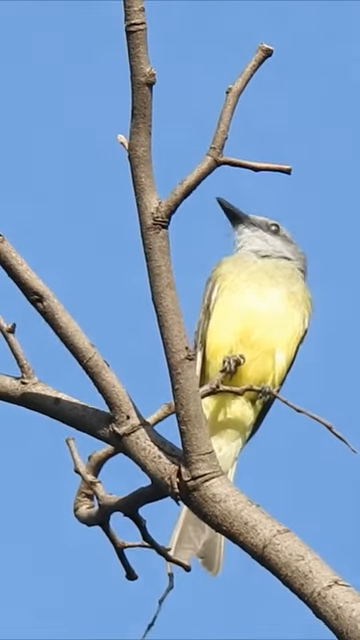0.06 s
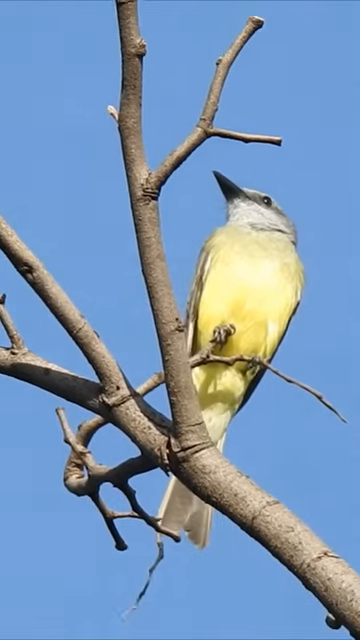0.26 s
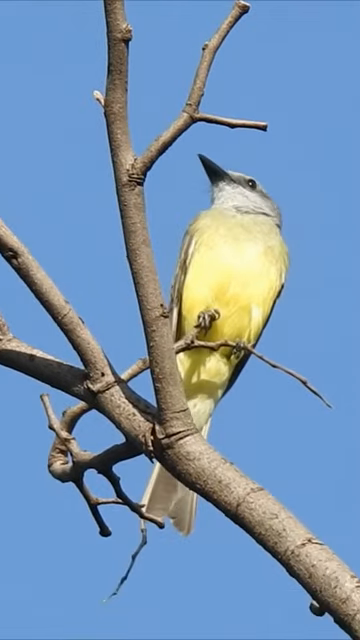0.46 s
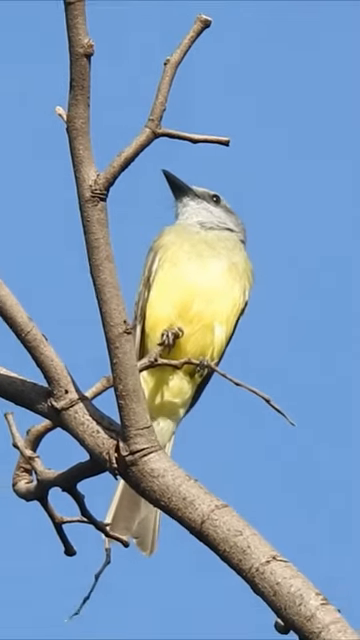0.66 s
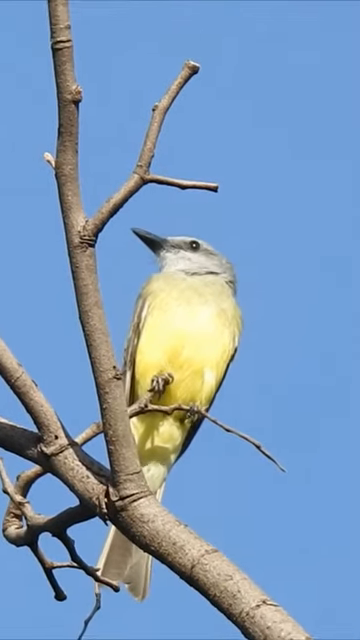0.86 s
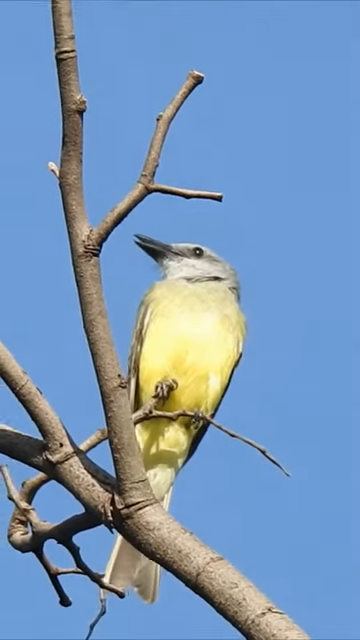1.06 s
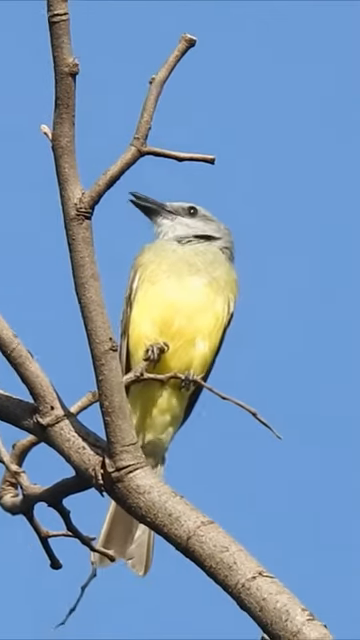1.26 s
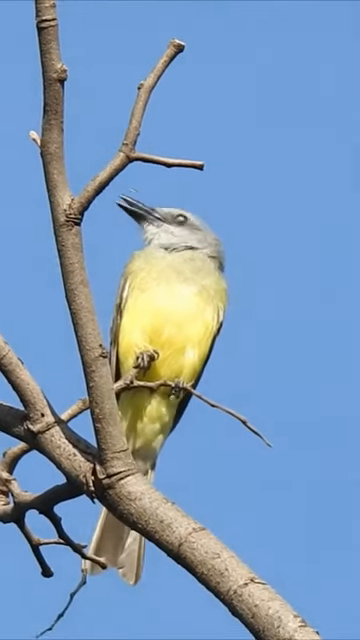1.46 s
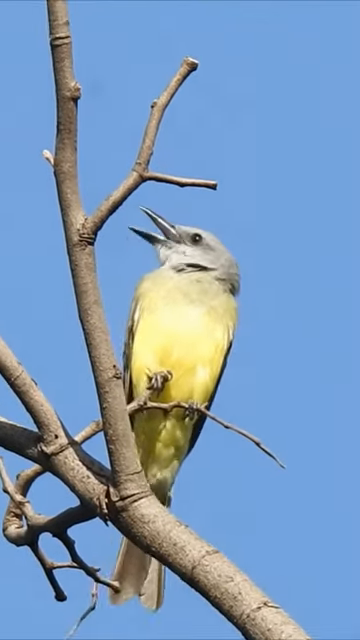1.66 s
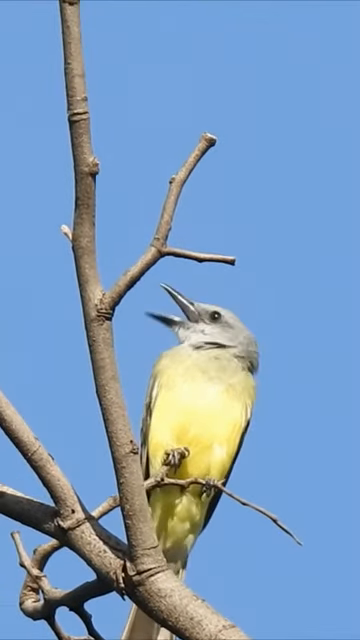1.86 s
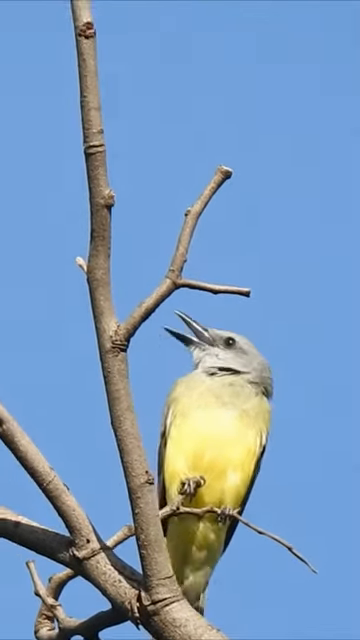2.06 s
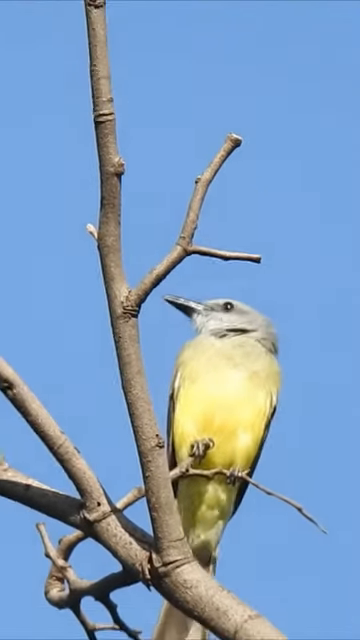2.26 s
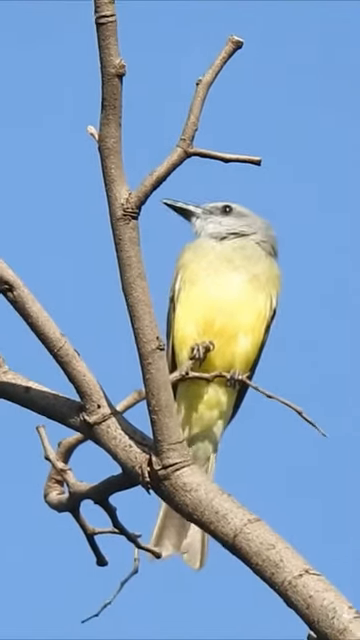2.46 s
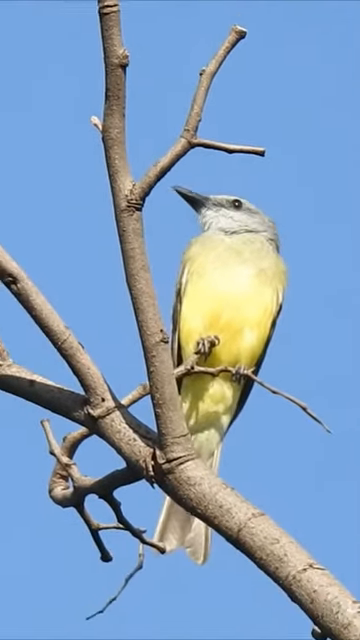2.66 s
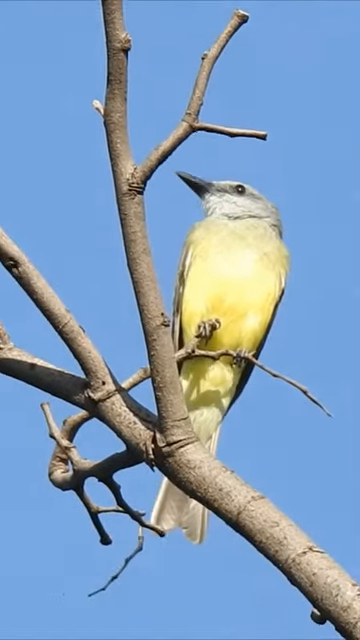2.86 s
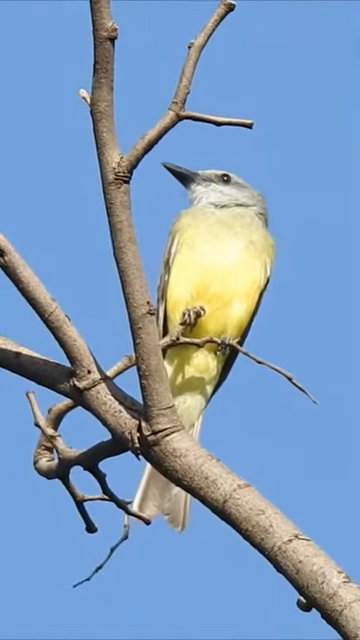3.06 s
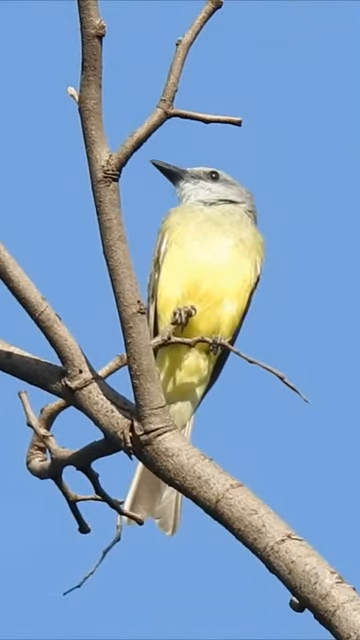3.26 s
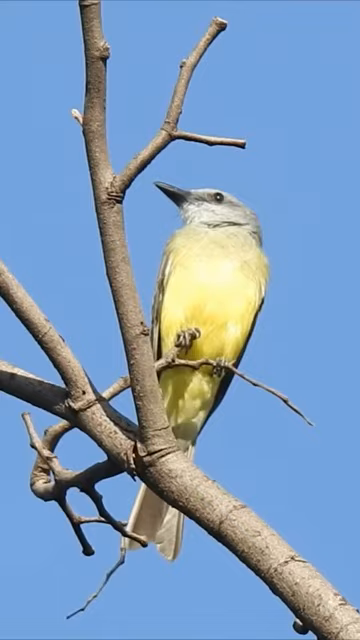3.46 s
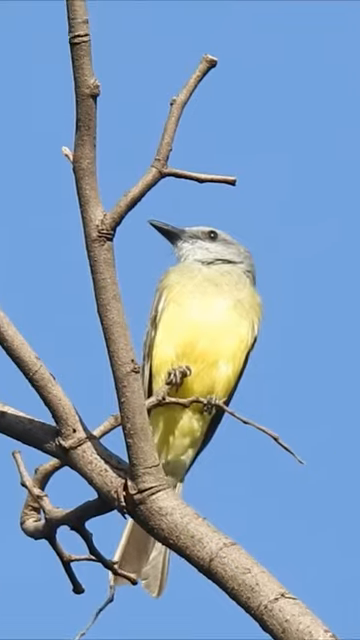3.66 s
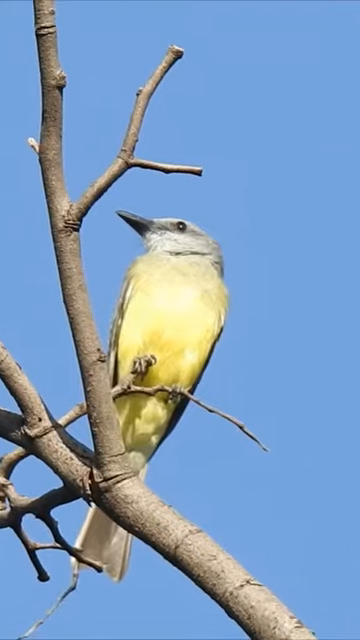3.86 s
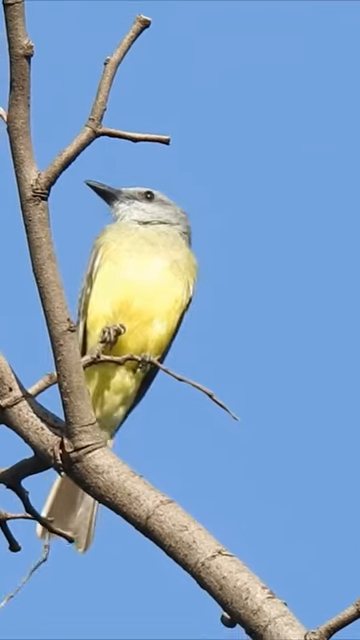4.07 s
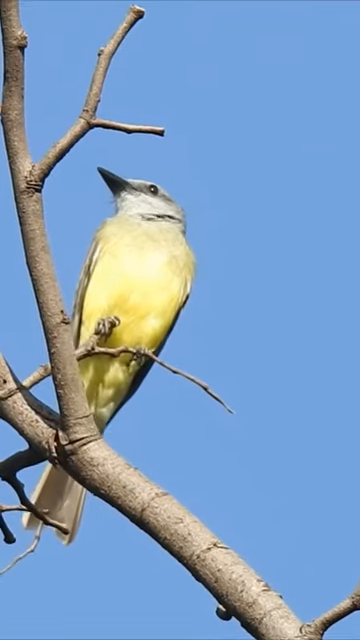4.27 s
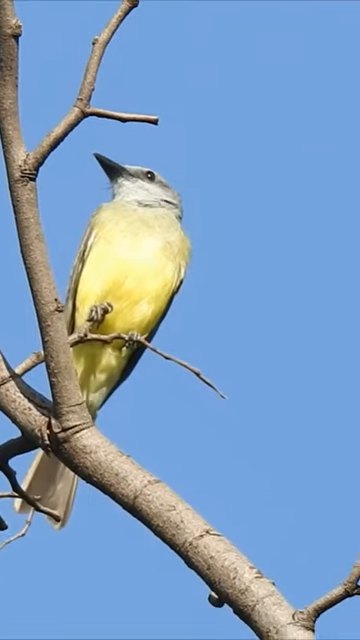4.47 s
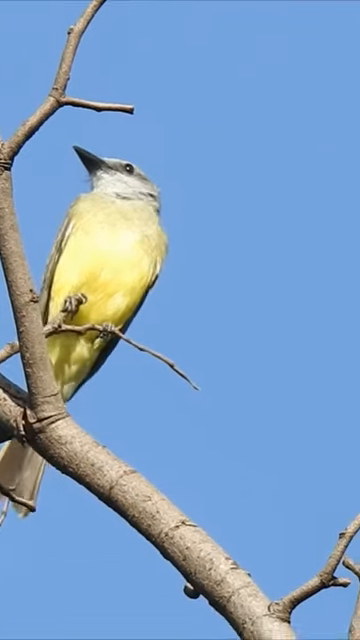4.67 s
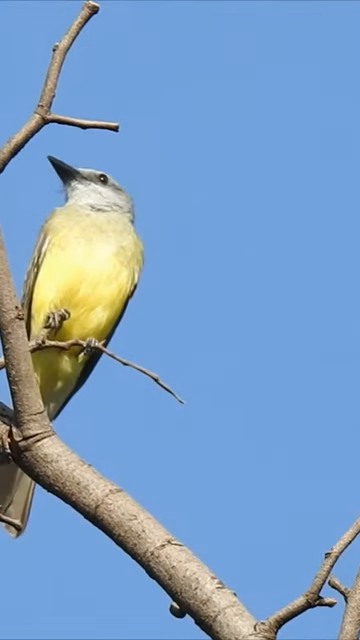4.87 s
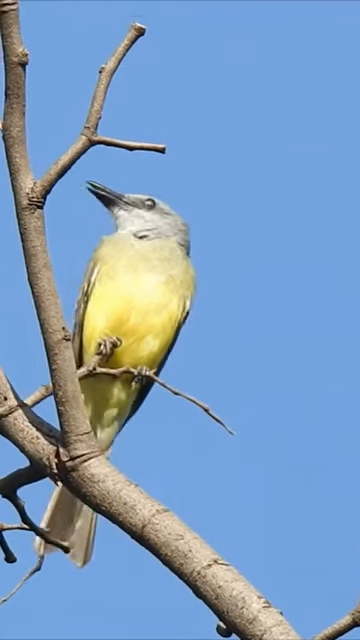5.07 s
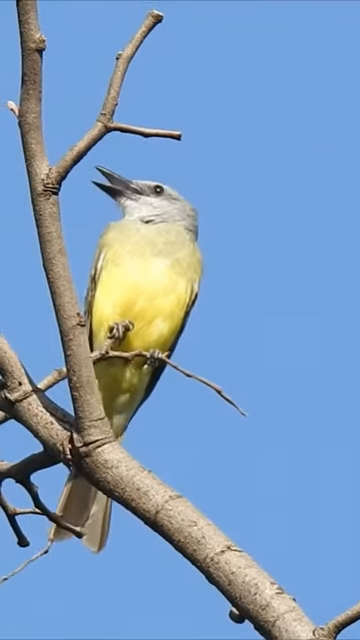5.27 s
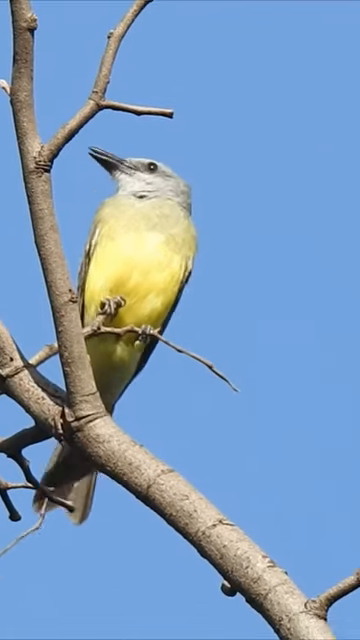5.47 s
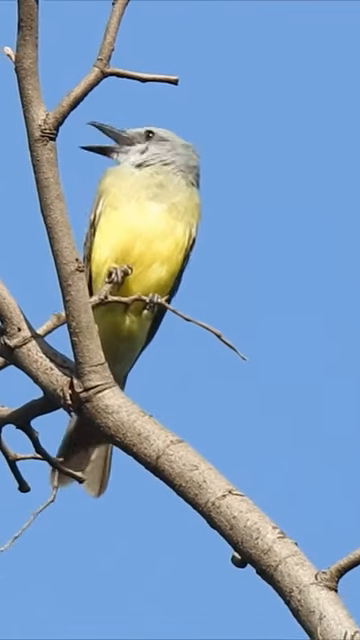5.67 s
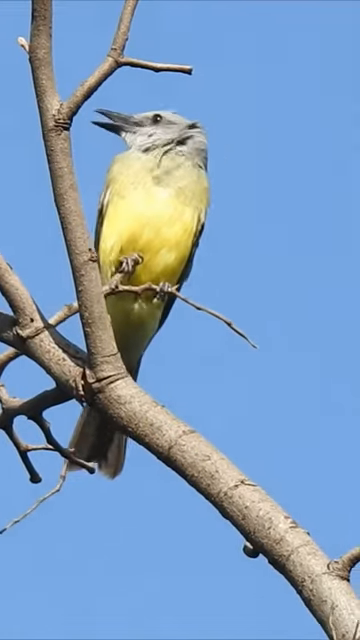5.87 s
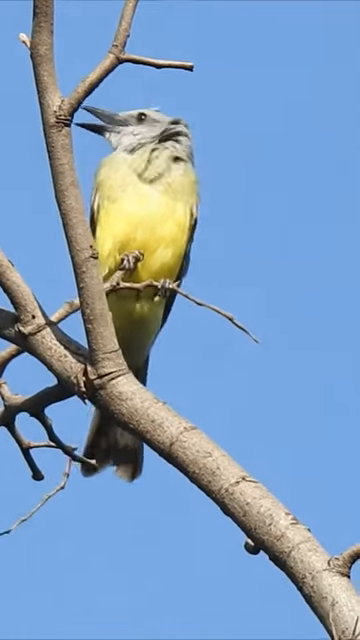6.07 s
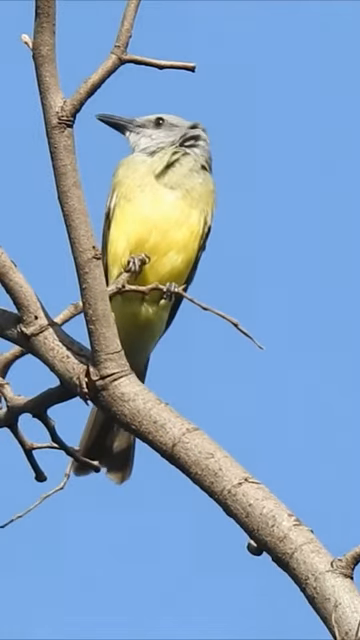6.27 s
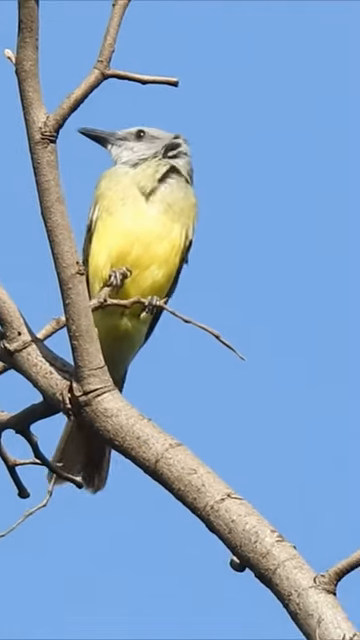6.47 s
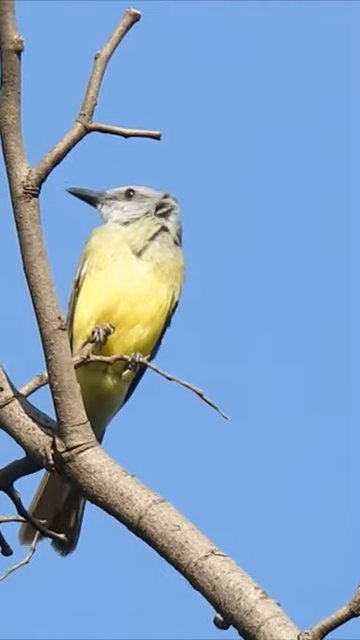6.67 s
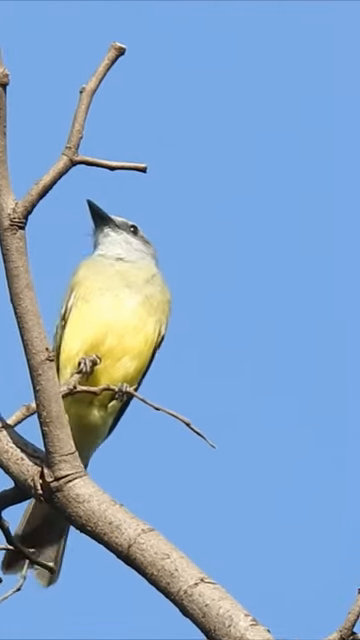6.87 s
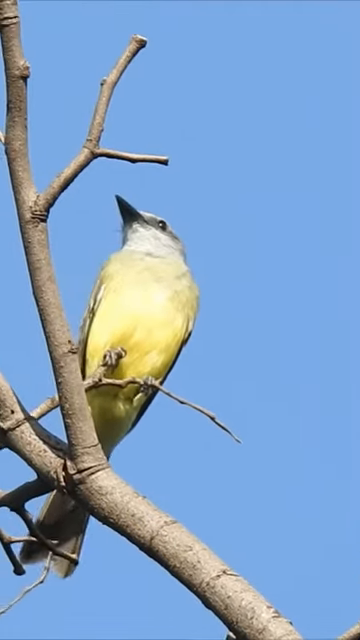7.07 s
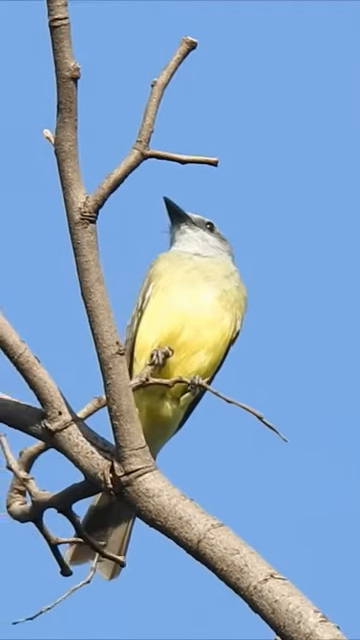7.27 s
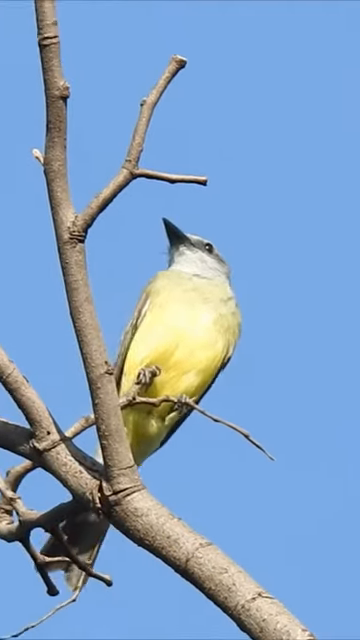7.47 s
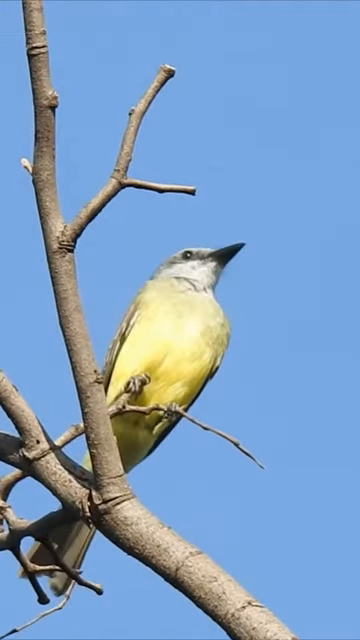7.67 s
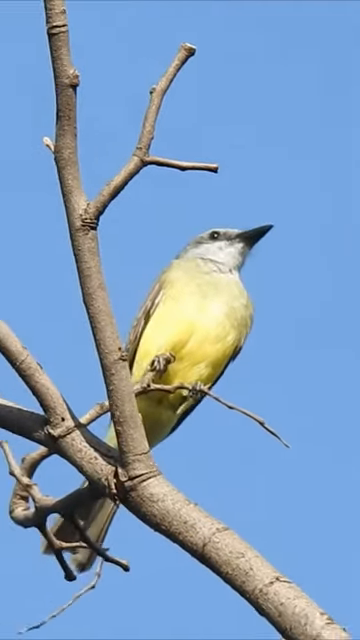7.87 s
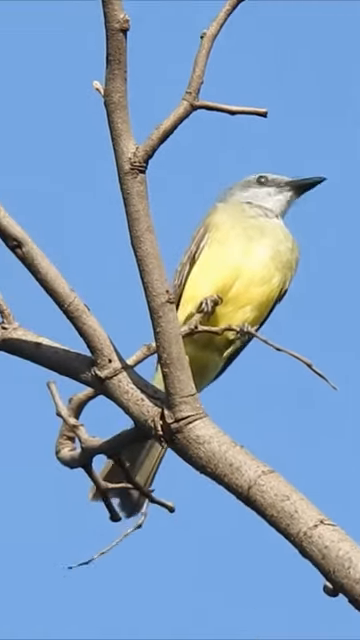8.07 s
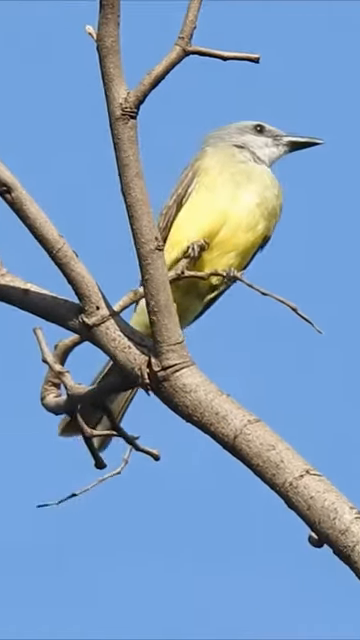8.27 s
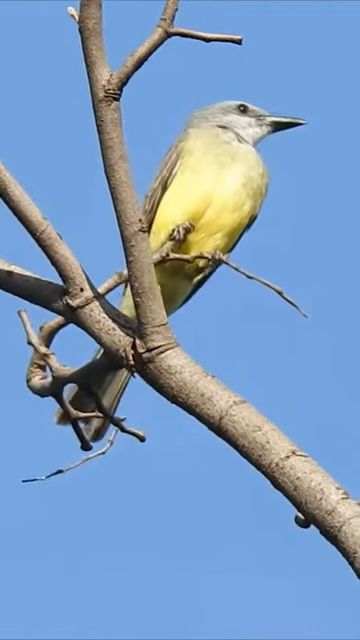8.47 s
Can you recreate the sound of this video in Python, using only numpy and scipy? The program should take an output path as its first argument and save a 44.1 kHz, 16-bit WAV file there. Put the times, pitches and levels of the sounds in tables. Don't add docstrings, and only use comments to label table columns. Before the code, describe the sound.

Outdoors near a road, a small yellow-breasted bird on a bare branch sings close to a hand-held camera. Its first rapid phrase of sharp, near-pure whistles comes after about a second, overloading slightly, with dry bill snaps. Far birds chip and slur, a neighbour trills quickly, then the singer repeats nearly the same phrase. Traffic wash, a thin insect hum and a low idling engine continue underneath; the engine fades at the end.

```python
import sys
import numpy as np
from scipy import signal
from scipy.fft import rfft, irfft, next_fast_len
from scipy.io import wavfile
from scipy.ndimage import uniform_filter1d, map_coordinates

SR = 44100
rng = np.random.default_rng(int(sys.argv[2]) if len(sys.argv) > 2 else 0)


def digitize_waveform(pressure):
    field = np.atleast_2d(pressure).T
    bounded = np.clip(field, -1, 1)
    quanta = np.round(bounded * 32767).astype(np.int16)
    wavfile.write(sys.argv[1], SR, quanta)


def amplitude_ratio(level_db):
    exponent = np.asarray(level_db, float) / 20
    return 10 ** exponent


N = 376173

# (frequency [Hz], density [dB per Hz])
RUMBLE = [(15, -39.5), (30, -23.5), (50, -4.5), (72, 3), (100, -4.5), (150, -14), (300, -43)]
# (time [s], half width [s], rise [dB])
REVS = [
    (2.1, .3, 3),
    (6.6, .45, 3),
]
# (frequency [Hz], density [dB per Hz])
TRAFFIC = [(60, -24), (130, 0.5), (250, 0), (600, -7), (1500, -9.5), (2300, -12.5), (3400, -13.5),
           (3900, -17), (4500, -12.5), (5500, -9), (7000, -18), (10000, -25.5), (15700, -33)]
# (frequency [Hz], width [Hz], level [dB])
DRONES = [(197, 26, 3.5), (400, 16, 2), (606, 50, 5.5), (850, 17, 6.5), (1030, 24, 7.5), (1358, 23, 6.5),
          (1492, 18, 7.5)]
# (time [s], half width [s], rise [dB])
PASSES = [(0, .2, 3), (.92, .25, 3), (2.0, .3, 1.5), (2.82, .14, 2.5), (3.42, .12, 2), (4.1, .35, 3),
          (4.85, .35, 2.5), (6.8, .5, 2), (8.5, .3, 3.5)]
# (frequency [Hz], width [Hz], level [dB])
INSECTS = [
    (4962, 80, 0),
    (5080, 170, -2),
]
# (time [s], level [dB])
CHORUS = [(0, -56), (2.4, -54), (4.75, -50), (6.4, -49.5), (8.53, -52)]
# (frequency [Hz], correlation [-1 to 1])
ALIKE = [(60, 1), (130, 0.87), (280, 0.77), (610, 0.75), (1310, 0.76), (2840, 0.4), (6140, 0.04)]
# (time [s], start [Hz], end [Hz], level [dB])
CHIPS = [(.745, 5700, 5850, -53), (.82, 6000, 6250, -52), (.893, 5900, 7200, -49),
         (2.94, 5700, 6470, -54.5), (3.09, 6200, 7020, -47), (3.555, 5400, 6140, -52),
         (3.83, 6300, 7200, -44), (6.79, 6400, 7300, -48), (7.56, 5500, 5900, -47), (7.69, 5500, 6600, -52),
         (7.795, 5300, 6300, -45), (7.855, 5500, 6400, -46), (7.91, 5300, 6200, -45.5),
         (8.0, 5900, 6000, -47)]
# (time [s], length [s], start [Hz], end [Hz], level [dB])
SLURS = [(.002, .18, 5600, 5160, -58), (.31, .05, 6250, 6150, -52), (.38, .12, 5950, 5700, -53.5),
         (1.0, .17, 5240, 5200, -60), (2.27, .05, 3100, 2950, -59), (3.19, .19, 5300, 5600, -53),
         (3.385, .085, 5070, 3950, -55.5), (3.6, .053, 6400, 6560, -55), (3.67, .11, 6000, 5960, -50),
         (4.02, .12, 5850, 6000, -59), (5.16, .12, 2900, 2914, -59), (7.39, .08, 5600, 5850, -52.5),
         (7.43, .09, 3500, 3420, -59), (7.49, .09, 2850, 2790, -61), (7.2, .1, 5500, 5550, -59),
         (7.5, .05, 5600, 5550, -56), (8.03, .05, 6100, 6500, -56)]
# (time [s], length [s], start [Hz], end [Hz], level [dB])
BUZZES = [(.76, .075, 3100, 3000, -59.5), (3.12, .09, 6400, 6800, -53.5), (3.265, .1, 8800, 6600, -53),
          (3.27, .16, 7600, 5800, -51), (3.1, .05, 7200, 7600, -57), (6.865, .09, 6600, 6950, -52.5)]
# (time [s], length [s], start [Hz], end [Hz], level [dB], roughness [Hz])
HORN = (.001, .25, 400, 392, -53.5, 14)
# (time [s], length [s], start [Hz], end [Hz], level [dB], roughness [Hz])
TWIG = (1.038, .0098, 2900, 3000, -50, 450)
# (time [s], top [Hz], level [dB])
TRILL = [(4.205, 5550, -37), (4.245, 5650, -40), (4.284, 6050, -32), (4.319, 6200, -33), (4.357, 6200, -34),
         (4.396, 6200, -33), (4.439, 6200, -33), (4.485, 6110, -35), (4.545, 6050, -32), (4.595, 6100, -44),
         (4.635, 6100, -48)]
# (time [s], peak level [dB], left over right [dB])
BILL_SNAPS = [(1.5225, -33.5, -4.5), (1.944, -25, 6), (5.661, -32, -3), (5.6663, -23, 10)]
# (share of the length [0-1], pitch height from low to top [0-1], level [dB])
OPENING_SHAPE = [(0, 1.7, -19), (.05, 1.35, -11), (.13, 0, -6.5), (.25, .7, -5.5), (.7, 1, 1),
                 (.9, .7, 0.5), (.97, -.4, -9), (1, -1.97, -25)]
ARCH_SHAPE = [(0, -0.74, -13.5), (.08, 0, -5), (.3, .7, -1.5), (.6, 1, 1.5), (.8, .8, -2),
              (.92, 0.13, -8.5), (1, -1.4, -22)]
FALL_SHAPE = [(0, 0.71, -11.5), (.1, .8, 0), (.35, 0.95, 1), (.7, .3, -1.5), (.88, -.5, -7.5),
              (1, -1.6, -23)]
BOW_SHAPE = [(0, -.2, -7), (.06, 0.19, -3), (.3, .85, 1), (.5, 0.97, -4), (.72, .92, -2), (.88, .7, -0.5),
             (.96, .2, -9), (1, -.8, -24)]
HOOK_SHAPE = [(0, -.4, -13), (.12, 0, -2), (.45, .8, -2), (.65, 1, -0.5), (.85, .55, -4.5), (1, -1.1, -24)]
SWEEP_SHAPE = [(0, -.2, -10.5), (.35, .35, 0.5), (.7, .75, -1), (1, 1, -24.5)]
KINK_SHAPE = [(0, -.2, -10), (.1, 0.29, -7), (.36, 1, -11), (.5, 0.41, -2), (.75, .65, 1), (.9, .3, -10.5),
              (1, -0.49, -24)]
CLOSE_SHAPE = [(0, -.6, -12), (.08, -.05, -8), (.3, .5, -0.5), (.55, 0.99, -2.5), (.8, 1, -4.5),
               (1, 0.37, -13.5)]
# (time [s], length [s], top [Hz], level [dB rms])
OPENINGS = [
    (1.176, .122, 5272, -8.5),
    (5.162, .109, 5250, -9),
]
ARCHES = [(1.319, .043, 5400, -5), (1.384, .037, 5434, -4), (1.45, .033, 5406, -4.5),
          (1.916, .023, 5364, -8.5), (1.955, .018, 5563, -11.5), (5.298, .043, 5380, -5.5),
          (5.364, .038, 5440, -5.5), (5.428, .034, 5410, -5.5), (5.948, .022, 5370, -8),
          (5.988, .017, 5500, -7)]
FALLS = [(1.545, .024, 5200, -10), (5.546, .025, 5126, -13)]
BOWS = [(1.64, .109, 6440, -8.5), (5.661, .121, 6386, -8.5)]
HOOKS = [(1.767, .036, 5900, -5), (1.821, .036, 5920, -5), (5.798, .037, 5870, -6), (5.854, .033, 5820, -6)]
SWEEPS = [(1.972, .022, 6950, -6), (6.017, .019, 7010, -10.5)]
KINKS = [(2.076, .042, 6500, -6.5), (2.134, .032, 6440, -6), (6.12, .042, 6450, -8.5),
         (6.179, .032, 6530, -5.5)]
CLOSES = [
    (2.18, .036, 6595, -6),
    (6.227, .035, 6530, -5.5),
]
# (frequency [Hz], level [dB])
THROAT = [(8000, -49), (9800, -29.5), (10800, -35.5), (11500, -44), (12200, -58), (14000, -66)]
# (frequency [Hz], level [dB])
HASH = [(3000, -62), (5500, -38), (7000, -26), (8200, -41), (11000, -35.5), (15500, -35.5)]


def unit(x):
    return x / np.sqrt(np.mean(x ** 2) + 1e-20)


def along(points, hz):
    f, v = np.transpose(points)
    return np.interp(np.log(hz + 1), np.log(f + 1), v)


def curve(rows):
    return np.interp(np.arange(N) / SR, *np.transpose(rows))


def wobble(rate, size=N):
    knots = rng.standard_normal(int(size * rate / SR) + 4)
    return map_coordinates(knots, [np.arange(size) * rate / SR])


def swells(rows):
    t = np.arange(N) / SR
    return sum(db * np.exp(-((t - s) / width) ** 2) for s, width, db in rows)


def filtered(x, response):
    m = next_fast_len(N + SR // 2)
    return irfft(rfft(x, m) * response(np.fft.rfftfreq(m, 1 / SR)), m)[..., :N]


def humps(peaks, hz):
    return sum(amplitude_ratio(2 * db) / (1 + (2 * (hz - c) / w) ** 2) for c, w, db in peaks)


def add(track, s, sound):
    track[round(s * SR):][:len(sound)] += sound


def rush(gain, patchy_db):
    z = signal.stft(rng.standard_normal((2, N)), nperseg=512)[2]
    field = uniform_filter1d(rng.standard_normal(z.shape[1:]), size=12, axis=1)
    field = uniform_filter1d(field, size=10, axis=0)
    pair = signal.istft(z * amplitude_ratio(patchy_db * unit(field)), nperseg=512)[1][:, :N]

    def response(hz):
        turn = np.arccos(np.clip(along(ALIKE, hz), -1, 1)) / 2
        return gain(hz) * np.array([np.cos(turn), np.sin(turn)])

    mid, side = filtered(pair, response)
    return unit(np.array([mid + side, mid - side]))


def engine():
    leaves_s, fade_db_per_s = 8.03, 30
    leaving_db = fade_db_per_s * np.clip(np.arange(N) / SR - leaves_s, 0, None)
    level_db = -49.7 + swells(REVS) - leaving_db
    return amplitude_ratio(level_db + 3.5 + 1.1 * wobble(5)) * rush(lambda hz: amplitude_ratio(along(RUMBLE, hz)), patchy_db=1.0)


def traffic():
    wash = rush(lambda hz: amplitude_ratio(along(TRAFFIC, hz)) * np.sqrt(1 + humps(DRONES, hz)), patchy_db=1.7)
    low = lambda hz: 1 / (1 + (hz / 3500) ** 4)
    steady = amplitude_ratio(-42) * filtered(wash, lambda hz: 1 - low(hz))
    road_db = -51.5 + swells(PASSES)
    swelling = amplitude_ratio(road_db + 5.0 + 1.2 * wobble(9) + .8 * wobble(20)) * filtered(wash, low)
    return steady + swelling


def insects():
    hum = rush(lambda hz: humps(INSECTS, hz), patchy_db=1.2)
    return amplitude_ratio(curve(CHORUS) + 0.83 * wobble(45)) * hum


def distant(notes):
    out = np.zeros(N)
    for s, length, from_hz, to_hz, db, rough_hz in notes:
        u = np.linspace(0, 1, int(length * SR))
        hz = from_hz + (to_hz - from_hz) * u ** .8 + rough_hz * wobble(400, size=len(u))
        gain = amplitude_ratio(db + 8.5 + 3.5 * wobble(150, size=len(u))) * np.sin(np.pi * u) ** 0.39
        add(out, s, gain * np.sin(2 * np.pi * np.cumsum(hz) / SR))
    return out


def far_off():
    chip_s, chip_rough_hz, slur_rough_hz, buzz_rough_hz = .023, 70, 80, 350
    chips = [(s, chip_s, from_hz, to_hz, db, chip_rough_hz) for s, from_hz, to_hz, db in CHIPS]
    slurs = [(*row, slur_rough_hz) for row in SLURS]
    buzzes = [(*row, buzz_rough_hz) for row in BUZZES]
    return distant(chips + slurs + buzzes + [HORN, TWIG])


def neighbour():
    rough_hz, full_voice_s = 50, 4.35
    stroke_s, stroke_rise_hz = .015, 620
    delay_s, reply_s, reply_rise_hz, over_hz, reply_db = .018, .019, 350, 170, -2
    strokes = []
    for s, hz, db in TRILL:
        strokes.append((s, stroke_s, hz - stroke_rise_hz, hz, db, rough_hz))
        if s > full_voice_s:
            top_hz = hz + over_hz
            strokes.append((s + delay_s, reply_s, top_hz - reply_rise_hz, top_hz, db + reply_db, rough_hz))
    return distant(strokes)


def echoes(x, t60, gap, alike):
    t = np.arange(SR // 2) / SR
    a, b = rng.standard_normal((2, len(t))) * amplitude_ratio(-60 * t / t60) * np.clip(t / gap - 1, 0, 1)
    turn = np.arccos(np.clip(alike, -1, 1)) / 2
    shared, apart = np.cos(turn) * a, np.sin(turn) * b
    tail = np.array([shared + apart, shared - apart])
    return signal.fftconvolve(x[None], tail / np.linalg.norm(tail[0]), axes=1)[:, :N]


def lagged(x, left_db, radians):
    sides = np.array([[1], [-1]])
    gain = amplitude_ratio(sides * left_db / 2)
    return filtered(np.array([x, x]), lambda hz: gain * np.exp(.5j * radians * hz / 6000 * sides))


def bill():
    out = np.zeros((2, N))
    fade = amplitude_ratio(-60 * np.arange(65) / SR / .003)
    for s, db, pan_db in BILL_SNAPS:
        grain = np.convolve(rng.standard_normal(65), [.6, .9, .9, .6], "same")
        snap = np.diff(grain * fade)
        add(out[0], s, amplitude_ratio(db + 1.5 + .5 * pan_db) * snap)
        add(out[1], s, amplitude_ratio(db + 1.5 - 0.56 * pan_db) * snap)
    return out


def whistles(shape, depth_hz, notes, flutter_hz=0, flutter_db=0):
    out = np.zeros(N)
    share, height, level = np.transpose(shape)
    for s, length, top_hz, db in notes:
        u = np.linspace(0, 1, int(length * SR))
        bend = uniform_filter1d(np.interp(u, share, height), size=len(u) // 12, mode="nearest")
        contour_db = np.interp(u, share, level)
        flutter = np.sin(2 * np.pi * 205 * length * u + 1.8 * wobble(62, size=len(u)))
        hz = top_hz + depth_hz * (bend - 1) + flutter_hz * flutter + 15 * wobble(300, size=len(u))
        phase = 2 * np.pi * np.cumsum(hz) / SR
        edge = np.clip(np.minimum(u, 1 - u) * length / 0.0013, 0, 1) ** 1.3
        gain = edge * amplitude_ratio(db + 3.4 + contour_db + flutter_db * flutter)
        octave = amplitude_ratio(along(THROAT, 2 * hz) + 0.49 * contour_db + 3.2 * wobble(500, size=len(u)))
        overtone = octave * np.sin(2 * phase + .6 * wobble(760, size=len(u)))
        add(out, s, gain * (np.sin(phase) + overtone))
    return out


def singer():
    song = whistles(OPENING_SHAPE, 340, OPENINGS, flutter_hz=88, flutter_db=-0.2)
    song += whistles(ARCH_SHAPE, 380, ARCHES)
    song += whistles(FALL_SHAPE, 320, FALLS, flutter_hz=130, flutter_db=-0.1)
    song += whistles(BOW_SHAPE, 1095, BOWS)
    song += whistles(HOOK_SHAPE, 535, HOOKS)
    song += whistles(SWEEP_SHAPE, 1540, SWEEPS)
    song += whistles(KINK_SHAPE, 1020, KINKS)
    song += whistles(CLOSE_SHAPE, 1005, CLOSES)
    return song


def scene():
    background = engine() + traffic() + insects()
    far, trill, song = far_off(), neighbour(), singer()
    others = amplitude_ratio(-2) * lagged(far, left_db=.1, radians=-1.8)
    others += amplitude_ratio(-5) * echoes(far, t60=.3, gap=.004, alike=.1)
    others += lagged(trill, left_db=-1.1, radians=2.36)
    others += amplitude_ratio(-5) * echoes(trill, t60=0.25, gap=0.0026, alike=-0.28)
    near = lagged(song, left_db=-.3, radians=0.064) + bill()
    near += amplitude_ratio(-11) * echoes(song, t60=.14, gap=.003, alike=-.1)
    near += amplitude_ratio(-6.2) * echoes(song, t60=0.27, gap=0.0091, alike=-.3)
    return background + others + near


def masked(x, under_db, slope_db):
    width, shadow_from_hz = 8, 6800
    hz, t, z = signal.stft(x, SR, nperseg=1024)
    power = (np.abs(z[:, :512]) ** 2).reshape(2, -1, width, len(t)).sum(axis=(0, 2))
    level = 10 * np.log10(power + 1e-14)
    centre = hz[width // 2:512:width]
    octaves = np.log2(centre[:, None] / centre[level.argmax(axis=0)])
    shadow = level.max(axis=0) - under_db - slope_db * octaves + 2.9 * rng.standard_normal(level.shape)
    keep = (level > shadow) | (octaves <= 0) | (centre[:, None] < shadow_from_hz)
    z[:, :512] *= np.repeat(keep, width, axis=0)
    return signal.istft(z, SR, nperseg=1024)[1][:, :N]


def roll_off(x):
    return signal.sosfilt(signal.butter(12, 15750, fs=SR, output="sos"), x)


def record(dry):
    size = np.abs(signal.hilbert(dry, next_fast_len(N))[:, :N])
    held = dry / (1 + (size / 1.06) ** 8) ** (1 / 8)
    squeezed = held / (1 + np.abs(held / 1.27) ** 7) ** (1 / 7)
    spit = amplitude_ratio(2.5) * np.clip(size - .56, 0, .3) * rng.standard_normal((2, N))
    overload = filtered(spit, lambda hz: amplitude_ratio(along(HASH, hz)))
    kept = filtered(squeezed + overload, lambda hz: hz < 15750)
    mix = masked(kept, under_db=32, slope_db=38)
    return roll_off(mix)


dry = scene()
out = record(dry)
digitize_waveform(out)
```